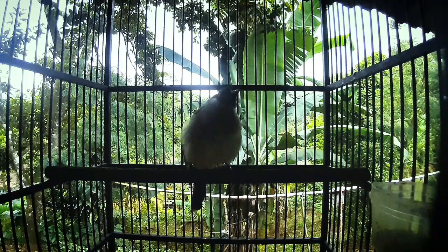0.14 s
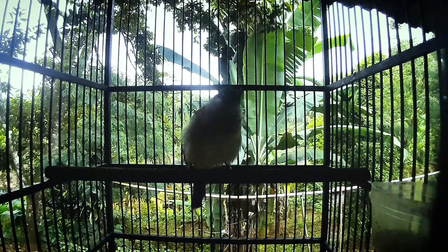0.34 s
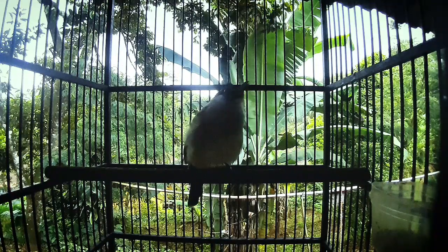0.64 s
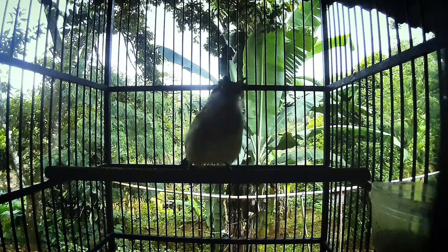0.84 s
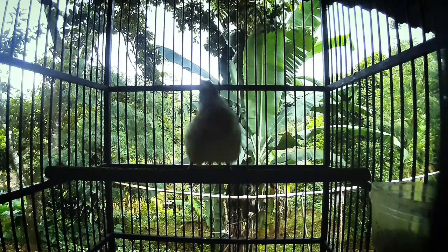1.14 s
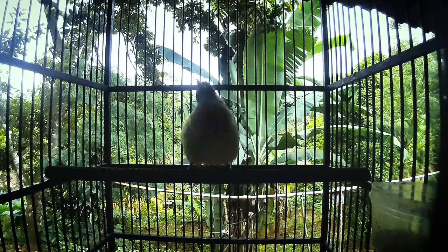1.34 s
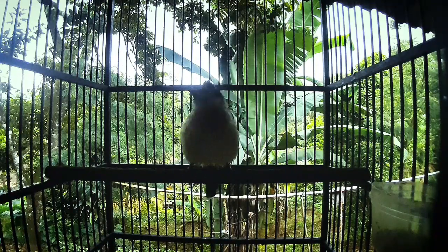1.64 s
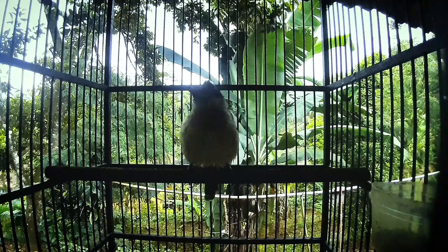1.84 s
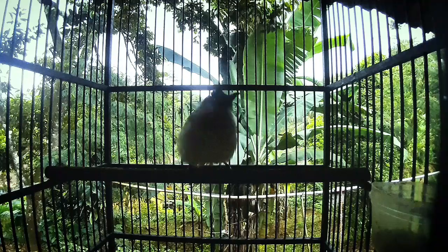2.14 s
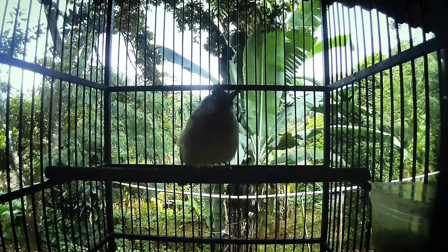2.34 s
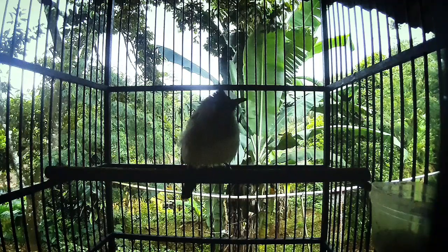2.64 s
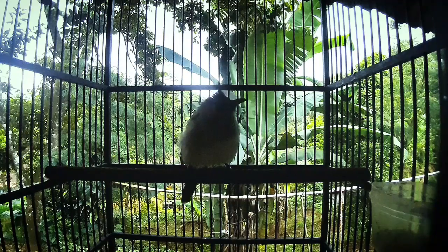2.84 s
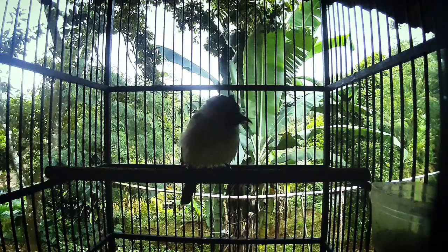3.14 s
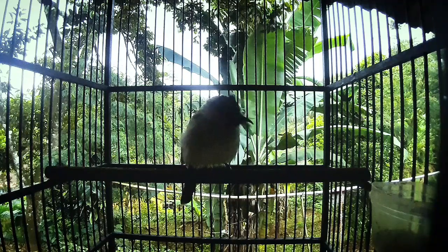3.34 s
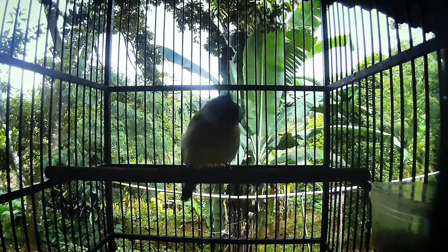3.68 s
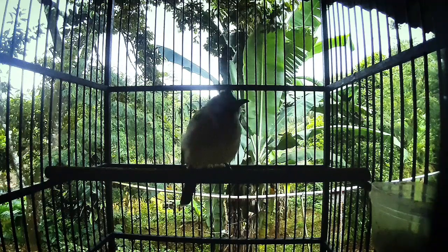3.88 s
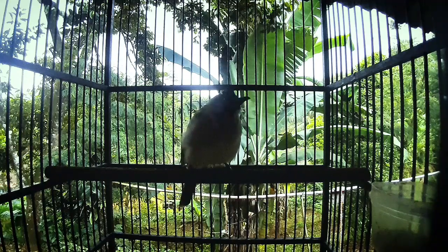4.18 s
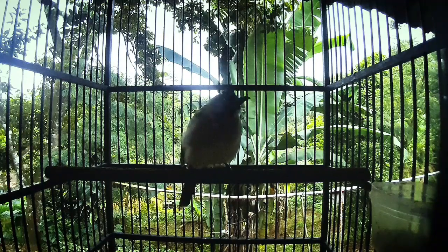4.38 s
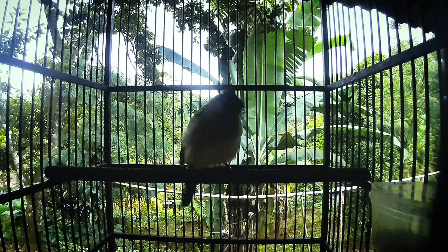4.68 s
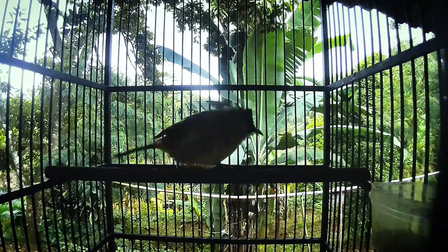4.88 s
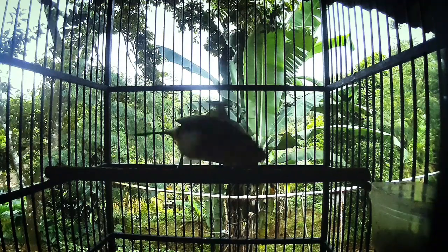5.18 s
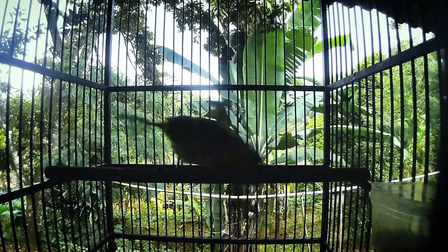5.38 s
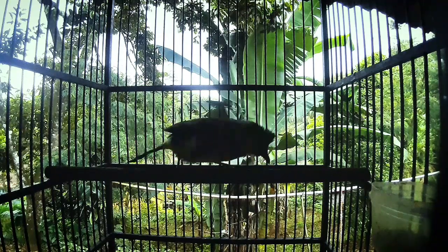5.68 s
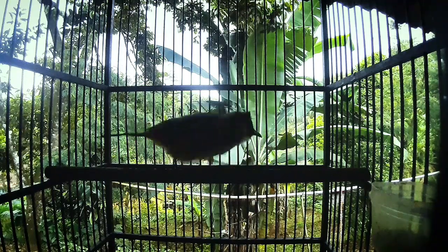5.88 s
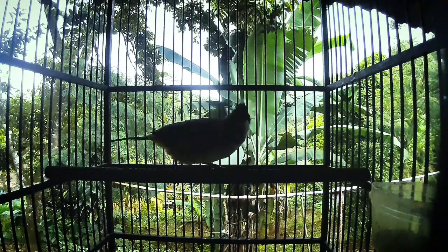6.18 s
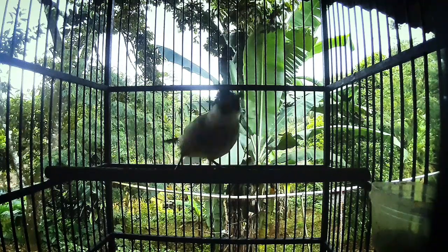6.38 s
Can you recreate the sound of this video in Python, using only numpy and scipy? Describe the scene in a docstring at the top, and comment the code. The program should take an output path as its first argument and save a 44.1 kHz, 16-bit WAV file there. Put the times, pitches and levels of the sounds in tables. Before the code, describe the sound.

Outdoors in a leafy garden, microphones close to a caged songbird. Over faint insects and a low motor hum, it gives a brief buzzy rasp, then a fast, loud, clear whistled phrase within the first second or so. The background sinks, leaving faint distant birds, then swells back. A sharp click comes as the bird moves, then claws tick lightly on bars and perch while a far bird repeats its whistle.

```python
"""A caged songbird close to the microphones gives a rasp and a whistled phrase: sines on drawn pitch curves.
Far birds and a fowl use the same voice, heard mostly as scatter through the trees.
Claws tick on perch and bars: clicks set resonances ringing.
Behind lie a motor (wavering sines, rumble), insects (resonant noise, clicks), thin high tones (sines)
and garden hiss (shaped noise); this background sinks during the loud phrase and comes back later."""
import sys
import numpy as np
from scipy import signal
from scipy.fft import rfft, irfft, next_fast_len
from scipy.io import wavfile

SR = 44100
rng = np.random.default_rng(int(sys.argv[2]) if len(sys.argv) > 2 else 0)


def transcribe(u):
    """Save the signal u as a 16-bit wav file named by the first command-line argument.

    u: samples, shape (n,) or (channels, n), limited to [-1, 1]; the rate is SR.
    q: integer samples, one column per channel.
    """
    v = np.clip(np.atleast_2d(u).T, -1, 1)
    q = np.round(v * 32767).astype(np.int16)
    wavfile.write(sys.argv[1], SR, q)


N = 287532
TIME = np.arange(N) / SR


def amp(db):
    """Decibels to gain."""
    return 10 ** (np.asarray(db) / 20)


def rms_one(x):
    """Scale to rms 1."""
    return x / np.sqrt(np.mean(x ** 2) + 1e-20)


def at_hz(points, hz):
    """Read a table of (Hz, value) on a log-frequency axis."""
    table_hz, values = np.array(points).T
    return np.interp(np.log(hz), np.log(table_hz), values)


def sides(pan_db):
    """Gains of the two channels, left minus right in dB."""
    return amp([[pan_db / 2], [-pan_db / 2]])


SMOOTH = signal.butter(4, .2)


def drift(rate_hz, size=N):
    """Slow chance, spread 1: ten draws a cycle, smoothed and interpolated."""
    step = SR / (10 * rate_hz)
    draws = rng.standard_normal(int(size / step) + 62)
    slow = signal.lfilter(*SMOOTH, draws)[60:]      # drop the filter's start-up
    return rms_one(np.interp(np.arange(size) / step, np.arange(len(slow)), slow))


def ring(x, hz, t60_s):
    """Two-pole resonance: a unit click sets a decaying sine of height 1 ringing."""
    radius, w = amp(-60 / (t60_s * SR)), 2 * np.pi * hz / SR
    return signal.lfilter([0, np.sin(w)], [1, -2 * radius * np.cos(w), radius ** 2], x + 1e-18)


def resonance(drive, hz, width_hz):
    """Band-pass resonance, as of a wing or membrane; rms 1."""
    band = signal.butter(2, [hz - width_hz / 2, hz + width_hz / 2], "band", fs=SR, output="sos")
    return rms_one(signal.sosfilt(band, drive))


# Likeness of the channels. Each row: frequency in Hz, left-right correlation (-1 to 1).
CHANNEL_LIKENESS = [(60, 0.95), (180, 0.91), (550, 0.51), (1650, -0.62), (4970, -0.02), (15000, -0.26)]


def coloured_noise(spectrum):
    """Stereo noise of a given spectrum, alike in the bass and unalike in the treble; rms 1."""
    size = next_fast_len(N)
    hz = np.maximum(np.arange(size // 2 + 1) * SR / size, 1)
    points = [(10, -90)] + list(spectrum) + [(SR / 2, -90)]
    alike = np.clip(at_hz(CHANNEL_LIKENESS, hz), -1, 1)
    mid, side = rfft(rng.standard_normal((2, size))) * amp(at_hz(points, hz))
    left_right = np.sqrt(1 + alike) * mid + np.sqrt(1 - alike) * side * [[1], [-1]]
    return rms_one(irfft(left_right, size)[:, :N])


def echoes(x, t60_s, rise_s, lumpy_db=0):
    """Scatter off leaves, trunks and walls: noise swells and dies, treble first, apart per channel; energy 1."""
    t = np.arange(SR) / SR
    lumps = amp(lumpy_db * drift(40, size=SR))      # single strong reflectors
    noise = rng.standard_normal((2, SR))
    dull = signal.sosfiltfilt(signal.butter(2, 3800, fs=SR, output="sos"), noise)
    tail = dull + (noise - dull) * amp(-30 * t / t60_s)
    tail = tail * lumps * amp(-60 * t / t60_s) * (1 - np.exp(-t / rise_s))
    tail /= np.sqrt(np.sum(tail ** 2, axis=1, keepdims=True))
    return signal.fftconvolve(np.atleast_2d(x), tail, axes=1)[:, :len(x)]


# Colour of beak and microphone on the weak overtones. Each row: frequency in Hz, gain in dB.
BEAK_MIC_COLOUR = [(1000, -10), (5000, -2), (7300, 2), (8400, -14), (9800, -12), (10800, -4), (12000, 8),
                   (15500, -3)]
MAIN_LINE_DB = -3      # weaker lines count as overtones


def voice(out_s, s, hz, level_db, overtones, rough, breath=0):
    """Sines on multiples of one pitch curve given at s, heard at out_s; weak overtones shake most."""
    turns = np.interp(out_s, s, np.cumsum(hz) / SR)
    pitch_hz = np.interp(out_s, s, hz)
    edges = np.minimum(1, np.minimum(s - s[0], s[-1] - s) / .002)
    effort_db = level_db - np.max(level_db)
    lines = 0
    for multiple, db in overtones:
        # overtones fade less than the main line
        colour_db = (at_hz(BEAK_MIC_COLOUR, multiple * pitch_hz) - .3 * effort_db) * (db < MAIN_LINE_DB)
        shake = 1 + rough * np.clip(-db / 2, 1, 20) * drift(410, size=len(s))
        audible = multiple * pitch_hz < .4 * SR
        lines = lines + audible * amp(db + colour_db) * shake * np.sin(2 * np.pi * multiple * turns)
    return np.sqrt(2) * amp(level_db) * edges * lines * (1 + breath * drift(3300, size=len(s)))


def unroll(rows, lead_s=0):
    """Sample span of a table, its times, and its columns sample by sample."""
    s, *columns = np.transpose(rows)
    span = slice(round((s[0] + lead_s) * SR), round((s[-1] + lead_s) * SR))
    t = np.arange(span.start, span.stop) / SR - lead_s
    return span, t, [np.interp(t, s, column) for column in columns]


WARBLE_HZ = 189


def warbled(t, hz, depth, level_db, swing_db, uneven):
    """A slow, uneven second oscillator swings the pitch; level dips at both turns, most at the top."""
    turn = 2 * np.pi * WARBLE_HZ * (t - t[0]) + 2.0 + uneven * drift(120, size=len(t))
    dip = np.sin(turn) ** 2 + .4 * np.sin(turn) + .2 * drift(300, size=len(t))
    swing = np.sin(turn) + .18 * drift(150, size=len(t))
    return hz * (1 + depth * swing), level_db - swing_db * dip


# Garden hiss. Each row: frequency in Hz, relative density in dB per Hz.
HISS_SPECTRUM = [(1000, -24.5), (2000, -11.5), (3500, -23), (5000, -11.5), (8500, -22), (11500, -18),
                 (12500, -21), (14300, -24.5), (15000, -21), (16000, -26)]


def garden_hiss():
    """Stereo noise with a shaped spectrum."""
    return amp(-8.5) * coloured_noise(HISS_SPECTRUM)


# Low motor orders. Each row: frequency in Hz, relative level in dB.
MOTOR_ORDERS = [(54, -16.5), (80.5, 0), (108, -13), (135, -2), (162, -2.5), (193, -1.5)]
# Motor rumble. Each row: frequency in Hz, relative density in dB per Hz.
RUMBLE_SPECTRUM = [(25, -31), (50, -9.5), (100, -8), (200, -4), (300, -6), (480, -13), (700, -24.5),
                   (1000, -26), (1500, -38)]


def motor():
    """Low orders of a slow motor, wavering in speed and strength, reach the right port first; rumble below."""
    right_lead_s = [[0], [.0004]]
    turns_s = TIME + np.cumsum(.015 * drift(5.9)) / SR + right_lead_s
    lines = 0
    for hz, db in MOTOR_ORDERS:
        lines = lines + amp(db + 2.5 * drift(10)) * np.sin(2 * np.pi * (hz * turns_s + rng.random()))
    return sides(2) * rms_one(lines) + amp(-9) * sides(.83) * coloured_noise(RUMBLE_SPECTRUM)


TONE_HZ, TONE_DB, TONE_PAN_DB = 15626, -14, -8.5


def high_tone():
    """A thin steady sine with a fringe of narrow-band noise around it."""
    fringe = resonance(rng.standard_normal((2, N)), TONE_HZ, width_hz=240)
    return amp(TONE_DB) * sides(TONE_PAN_DB) * (np.sin(2 * np.pi * TONE_HZ * TIME) + amp(-4) * fringe)


# Thin wavering high tones. Each row: start in seconds, end in seconds, pitch in Hz, relative mean level in dB.
THIN_TONES = [(0., .5, 6650, -15), (0., .45, 6800, -25), (1.2, 2.5, 6500, -25), (5.28, 6.52, 6810, -21),
              (5.28, 6.52, 6510, -20), (5.45, 6.52, 6215, -19), (5.6, 6.52, 6660, -24),
              (6.05, 6.52, 6065, -21)]


def thin_tones():
    """Each thin high tone is a sine, wavering in level and phase, that fades in and out."""
    out = 0
    for start_s, end_s, hz, db in THIN_TONES:
        fade = np.clip(np.minimum(TIME - start_s, end_s - TIME) / .05 + .5, 0, 1)
        out = out + fade * amp(db + 5.0 * drift(12)) * np.sin(2 * np.pi * (hz * TIME + .2 * drift(5)))
    return out


# Smooth insect choruses. Each row: centre in Hz, width in Hz, relative level in dB, left minus right in dB.
CHORUSES = [(6058, 350, -9.5, 6.5), (7240, 730, -5, 0.5)]


def insect_choruses():
    """Noise through wing resonances, wavering slightly in level."""
    out = 0
    for hz, width_hz, db, pan_db in CHORUSES:
        band = resonance(rng.standard_normal((2, N)), hz, width_hz)
        out = out + amp(db + .4 * drift(3)) * sides(pan_db) * band
    return out


CICADA_HZ, CICADA_WIDTH_HZ, CICADA_DB, CICADA_CLICKS_PER_S = 10266, 930, 2.5, 102.6


def cicada():
    """A steady click train, blurred by scatter, and noise drive a membrane resonance."""
    clicks = np.diff(np.floor(CICADA_CLICKS_PER_S * TIME + .0071 * drift(20)), prepend=0)
    blurred = rms_one(echoes(clicks, t60_s=.06, rise_s=.001))
    drive = 1.3 * rng.standard_normal((2, N)) + blurred
    return amp(CICADA_DB) * resonance(drive, CICADA_HZ, CICADA_WIDTH_HZ)


# Background course. Each row: time in seconds, motor gain in dB, gain of insects, tones and hiss in dB.
BACKGROUND_COURSE = [(0.0, -46, -61.5), (0.3, -48, -61.5), (0.8, -53, -63), (1.18, -61, -72),
                     (2.96, -62, -72.5), (3.47, -58.5, -70), (3.85, -51, -66.5), (4.57, -47, -60),
                     (5.66, -49, -60.5), (6.52, -48.5, -61.5)]


def background():
    """Motor, insects, tones and hiss under two gain curves that sink during the loud phrase and come back."""
    s, motor_db, treble_db = np.transpose(BACKGROUND_COURSE)
    treble = insect_choruses() + thin_tones() + cicada() + high_tone() + garden_hiss()
    return amp(np.interp(TIME, s, motor_db)) * motor() + amp(np.interp(TIME, s, treble_db)) * treble


LEAD_S = .4      # far calls that began this long before still ring
# Short rising note. Each row: time from note start in seconds, pitch in Hz, relative level in dB.
RISE_CURVE = [(0., 3750, -10), (.015, 4050, -2), (.04, 4250, 0), (.06, 4450, -5), (.078, 4500, -20)]
# Note that dips. Each row: time from note start in seconds, usual pitch in Hz, relative level in dB.
DIP_CURVE = [(0., 3500, -17), (.02, 3300, -10), (.044, 3245, 0), (.052, 3150, -7), (.066, 2295, -13),
             (.1, 2420, -21), (.13, 2720, -11), (.165, 2880, -15), (.19, 2800, -38)]
# Repeats of the phrase. Each row: rising note start in seconds, its level in dB, dipping note start in
# seconds, its level in dB, last pitch as a multiple of the usual, boost of the last part in dB.
PHRASE_REPEATS = [(-.36, -45, -.18, -38, 1.07, 8), (1.82, -61, 1.982, -42, 1.06, 5),
                  (2.98, -62, 3.15, -44, 1.04, 6), (4.7, -44, 4.876, -31, .98, 2),
                  (5.595, -41, 5.782, -31, .99, 3)]
LAST_FROM_S = .1      # where the last part of the dipping note takes over


def far_phrases():
    """One bird repeats a rising and a dipping note, as rows of (s, Hz, dB)."""
    notes = []
    for rise_s, rise_db, dip_s, dip_db, last, last_db in PHRASE_REPEATS:
        notes.append([(rise_s + s, hz, rise_db + db) for s, hz, db in RISE_CURVE])
        dip = []
        for s, hz, db in DIP_CURVE:
            if s > LAST_FROM_S:
                hz, db = hz * last, db + last_db
            dip.append((dip_s + s, hz, dip_db + db))
        notes.append(dip)
    return notes


# Slides of another far bird. Each row: start in seconds, peak level in dB.
SLIDE_STARTS = [(3.04, -70), (3.435, -72), (3.845, -64), (4.23, -59)]
SLIDE_TOP_HZ, SLIDE_END_HZ, SLIDE_S, SLIDE_SETTLE_S, SLIDE_EDGE_DB = 4750, 2300, .17, .12, -14


def far_slides():
    """Another bird slides down exponentially toward a low pitch, as rows of (s, Hz, dB)."""
    s = np.linspace(0, SLIDE_S, num=12)
    hz = SLIDE_END_HZ + (SLIDE_TOP_HZ - SLIDE_END_HZ) * np.exp(-s / SLIDE_SETTLE_S)
    arch_db = SLIDE_EDGE_DB * (2 * s / SLIDE_S - 1) ** 2
    return [np.transpose([start_s + s, hz, db + arch_db]) for start_s, db in SLIDE_STARTS]


# Overtones of far whistles. Each row: multiple of the pitch, relative level in dB.
FAR_WHISTLE_OVERTONES = [(1.0, 3), (2.0, -30), (3.0, -44)]


def far_whistles():
    """Dry far whistles: pitch unsteadies with height; starts LEAD_S early."""
    out = np.zeros(N + round(LEAD_S * SR))
    for rows in far_phrases() + far_slides():
        span, t, (hz, level_db) = unroll(rows, LEAD_S)
        unsteady = 1 + .013 * (hz / 3300) ** 2 * drift(100, size=len(t))
        out[span] += voice(t, t, hz * unsteady, level_db, FAR_WHISTLE_OVERTONES, rough=.05)
    return out


# Far fowl calls. Each row: start in seconds, length in seconds, first pitch in Hz, last pitch in Hz,
# level in dB, hoarseness as share of pitch, tilt in dB per multiple above the third.
FOWL_CALLS = [(-.2, .6, 480, 445, -76, .016, -10), (1.9, .3, 330, 300, -71.5, .08, 0),
              (3.03, .27, 543, 505, -88, .02, -4)]
# Overtones of the fowl. Each row: multiple of the pitch, relative level in dB before the tilt.
FOWL_LINES = [(1.0, -16), (2.0, -3), (3.0, 0), (4.0, -2), (5.0, -1), (6.0, -1), (7.0, -2)]
FOWL_EDGE_S, FOWL_EDGE_DB = .04, -6


def far_fowl():
    """Dry fowl calls: gliding pitch shaken by hoarseness; starts LEAD_S early."""
    out = np.zeros(N + round(LEAD_S * SR))
    for s, length_s, first_hz, last_hz, db, hoarse, tilt_db in FOWL_CALLS:
        overtones = [(k, k_db + tilt_db * max(k - 3, 0)) for k, k_db in FOWL_LINES]
        span, t, (hz,) = unroll([(s, first_hz), (s + length_s, last_hz)], LEAD_S)
        from_edge_s = np.minimum(t - s, s + length_s - t)
        level_db = db + FOWL_EDGE_DB * np.clip(1 - from_edge_s / FOWL_EDGE_S, 0, 1)
        hz = hz * (1 + hoarse * drift(60, size=len(t)))
        out[span] += voice(t, t, hz, level_db, overtones, rough=.1)
    return out


# Far rasps. Each row: start in seconds, length in seconds, mean pitch in Hz, level in dB before the dips.
FAR_RASP_CALLS = [(1.293, 0.055, 2290, -73), (1.417, 0.056, 2476, -70), (1.585, 0.062, 2430, -69.5),
                  (1.767, 0.076, 2446, -69.5), (5.568, .07, 2272, -60), (5.883, 0.062, 2160, -57.5),
                  (6.114, 0.076, 2145, -57.5)]
# Overtones of far rasps. Each row: multiple of the pitch, relative level in dB.
FAR_RASP_LINES = [(1.0, -5), (2.0, 14), (3.0, 2), (4.0, -12), (5.0, -28)]


def far_rasps():
    """Dry far rasps: a breathy voice under deep warble, swelling and fading."""
    out = np.zeros(N)
    for s, length_s, pitch_hz, db in FAR_RASP_CALLS:
        shape = [(s, .2), (s + .3 * length_s, 1), (s + .8 * length_s, 1), (s + length_s, .2)]
        span, t, (swell,) = unroll(shape)
        hz, level_db = warbled(t, pitch_hz, .2, db, swing_db=6.0, uneven=.8)
        out[span] += swell * voice(t, t, hz, level_db, FAR_RASP_LINES, rough=.15, breath=.35)
    return out


def far_birds():
    """Far voices arrive almost only as scatter, dulled by the air."""
    calls = far_whistles() + far_fowl()
    short_tail = echoes(calls, t60_s=.55, rise_s=.015, lumpy_db=1.5)
    long_tail = amp(-14) * echoes(calls, t60_s=.95, rise_s=.05)
    calls_heard = sides(5) * (amp(-14) * calls + short_tail + long_tail)
    rasps_heard = sides(1.23) * echoes(far_rasps(), t60_s=.43, rise_s=.0033, lumpy_db=2.5)
    return calls_heard[:, -N:] + rasps_heard


# Claw touches. Each row: time in seconds, then relative drives in dB of dry crack, bars and perch.
CLAW_TOUCHES = [(3.919, -60, -82, -83), (4.681, -29, -60, -77), (5.13, -82, -55.5, -69),
                (5.283, -58, -47.5, -70), (5.39, -70, -60, -64.5), (5.507, -52, -61, -50.5),
                (5.599, -62, -49, -71), (5.759, -52, -48, -50), (5.835, -52, -44, -59),
                (6.098, -70, -62, -57)]
# Cage bar resonances. Each row: frequency in Hz, relative level in dB, decay t60 in seconds.
BAR_MODES = [(5300, -2, .018), (6480, -6, .008), (7200, -8, .008), (8790, 0, .022), (12500, -12, .012)]
# Perch resonances. Each row: frequency in Hz, relative level in dB, decay t60 in seconds.
PERCH_MODES = [(415, 1.5, 0.051), (720, -2.5, 0.051), (880, -6, 0.02), (1465, -7.5, 0.064),
               (1924, -5.5, 0.013), (2436, -7, 0.013)]


def claws():
    """Each touch cracks, rings the bars and knocks the perch with strengths of its own; a dull thud follows."""
    s, crack_db, bars_db, perch_db = np.transpose(CLAW_TOUCHES)
    at, out = np.round(s * SR).astype(int), np.zeros(N)
    modes = BAR_MODES + PERCH_MODES
    luck_db = rng.normal(0, 2.5, (len(at), len(modes)))

    def clicks(db):
        """One-sample clicks at the touches."""
        train = np.zeros(N)
        train[at] = amp(db)
        return train

    for k, (hz, db, t60_s) in enumerate(modes):
        drive_db = bars_db if k < len(BAR_MODES) else perch_db
        out += ring(clicks(db + luck_db[:, k] + drive_db), hz, t60_s)
    out += ring(ring(clicks(crack_db - 9), 11900, .002), 14000, .002)      # two short rings keep it thin
    dying = signal.lfilter([1], [1, -amp(-60 / (.12 * SR))], clicks(perch_db + 6))
    thud_band = signal.butter(2, [300, 2600], "band", fs=SR, output="sos")
    out += signal.sosfilt(thud_band, dying * rng.standard_normal(N))
    return sides(5) * (out + amp(-4) * echoes(out, t60_s=.12, rise_s=.002))


# Whistled notes, one table a note. Each row: time in seconds, pitch in Hz, left level in dB.
SONG_NOTES = [
    [(.688, 2700, -47), (.697, 3200, -24), (.705, 3230, -16), (.709, 2950, -11), (.722, 2935, -9),
     (.731, 3000, -21)],
    [(.731, 2700, -21), (.736, 2440, -20), (.748, 2385, -14), (.757, 2420, -12), (.763, 2505, -9),
     (.775, 2515, -15), (.787, 2490, -41)],
    [(.83, 2620, -37), (.836, 3000, -13), (.84, 3200, -10), (.845, 3010, -8), (.858, 2950, -12),
     (.866, 2920, -27), (.874, 2900, -41)],
    [(.884, 2840, -36), (.891, 3400, -12), (.895, 3800, -13), (.9, 3780, -8), (.906, 3590, -7),
     (.912, 3570, -4.5), (.937, 3565, -6), (.944, 3560, -13), (.951, 3560, -33)],
    [(1.012, 3000, -40), (1.022, 3140, -11), (1.034, 3220, -8), (1.044, 3200, -6), (1.055, 3250, -18),
     (1.059, 3120, -13)],
    [(1.059, 3000, -15), (1.063, 2690, -10), (1.072, 2590, -16), (1.084, 2460, -12), (1.092, 2320, -19),
     (1.099, 2180, -20), (1.11, 2330, -28)],
    [(1.11, 2340, -30), (1.127, 2600, -20), (1.138, 2650, -11), (1.158, 2755, -6), (1.174, 2750, -11),
     (1.182, 2710, -39)],
]
# Overtones of the whistle. Each row: multiple of the pitch, relative level in dB.
SONG_LINES = [(.5, -43), (1.0, 0), (1.5, -46), (2.0, -35), (2.5, -48), (3.0, -39), (3.5, -54), (4.0, -33),
              (4.5, -46), (5.0, -32), (6.0, -38)]
# Rasp. Each row: time in seconds, pitch in Hz, left level in dB before the dips, warble depth as share of pitch.
RASP_CURVE = [(.435, 1050, -40, .02), (.447, 1550, -27, .05), (.454, 2020, -16, .13), (.48, 2130, -11, .13),
              (.508, 2060, -12, .13), (.522, 2050, -42, .13)]
# Overtones of the rasp. Each row: multiple of the pitch, relative level in dB.
RASP_LINES = [(1.0, -11), (2.0, 0), (3.0, -26), (4.0, -30), (5.0, -37), (6.0, -54), (7.0, -39)]
# Whistle at the right port. Each row: pitch in Hz, weaker than left by dB, later than left by microseconds.
RIGHT_PORT_HEARS = [(2200, 7, 90), (2400, 2.5, 138), (2500, 3, 122), (2600, 0, 185), (2670, 8, 230),
                    (2770, 9, 160), (2950, 9, 102), (3200, 9.5, 103), (3450, 4, 105), (3570, 2.5, 115),
                    (3800, 12, 150)]
# Rasp at the right port. One row: left minus right in dB, right lag in microseconds.
RASP_AT_RIGHT = (4, 100)


def caged_bird():
    """The near voice reaches the left port first and mostly louder; scatter adds two tails."""
    out = np.zeros((2, N))
    port_hz, port_db, port_us = np.transpose(RIGHT_PORT_HEARS)
    for rows in SONG_NOTES + [RASP_CURVE]:
        span, t, (hz, level_db, *depth) = unroll(rows)
        if depth:      # only the rasp has a warble column
            hz, level_db = warbled(t, hz, depth[0], level_db, swing_db=5.0, uneven=.6)
            overtones, rough, breath = RASP_LINES, .03, .12
            pan_db, lag_us = RASP_AT_RIGHT
        else:
            overtones, rough, breath = SONG_LINES, .025, .003
            pan_db, lag_us = np.interp(hz, port_hz, port_db), np.interp(hz, port_hz, port_us)
        out[0, span] += voice(t, t, hz, level_db, overtones, rough, breath)
        out[1, span] += voice(t - lag_us / 1e6, t, hz, level_db - pan_db, overtones, rough, breath)
    # a small beak radiates no bass
    out = signal.sosfilt(signal.butter(4, 950, "high", fs=SR, output="sos"), out)
    short_tail = amp(-25) * echoes(out[0], t60_s=.19, rise_s=.01)
    moving_leaves = .6 + .8 * drift(200)      # they blur the long tail
    long_tail = amp(-40) * echoes(out[0] * moving_leaves, t60_s=.7, rise_s=.03)
    return out + short_tail + long_tail


def scene():
    """Background, far birds, claws and the near bird."""
    return background() + far_birds() + claws() + caged_bird()


CUTOFF_HZ = 15800


def record(dry):
    """A steep elliptic low-pass cuts the top."""
    return signal.sosfilt(signal.ellip(12, .5, 75, CUTOFF_HZ, fs=SR, output="sos"), dry)


dry = scene()
out = record(dry)
transcribe(out)
```